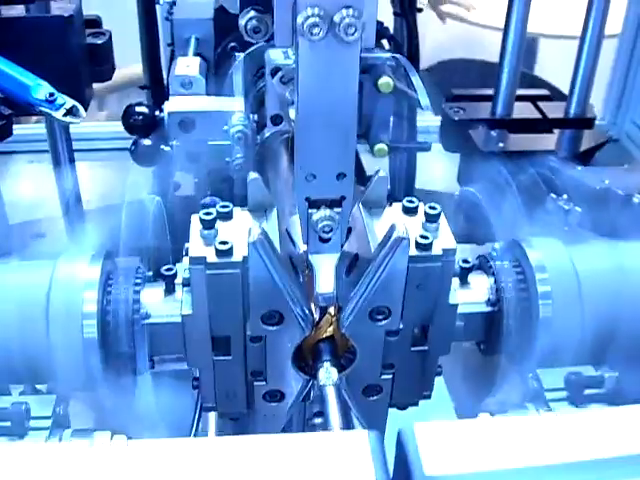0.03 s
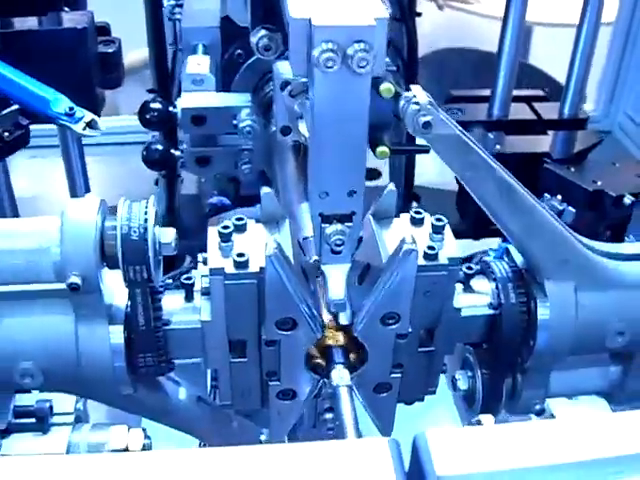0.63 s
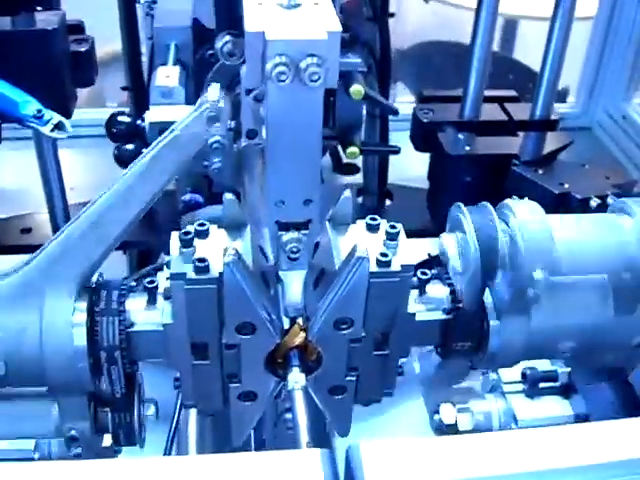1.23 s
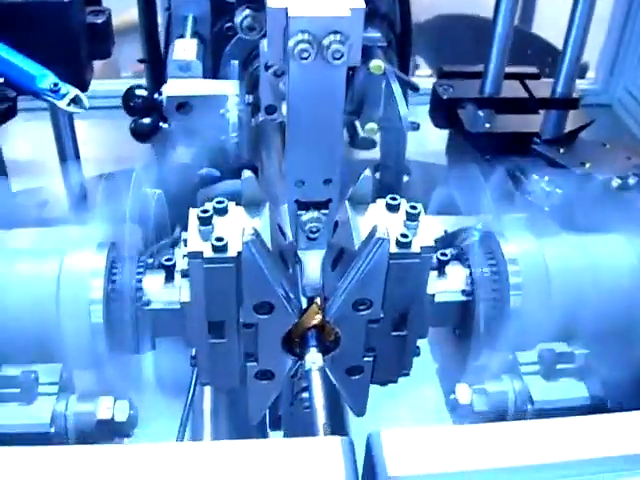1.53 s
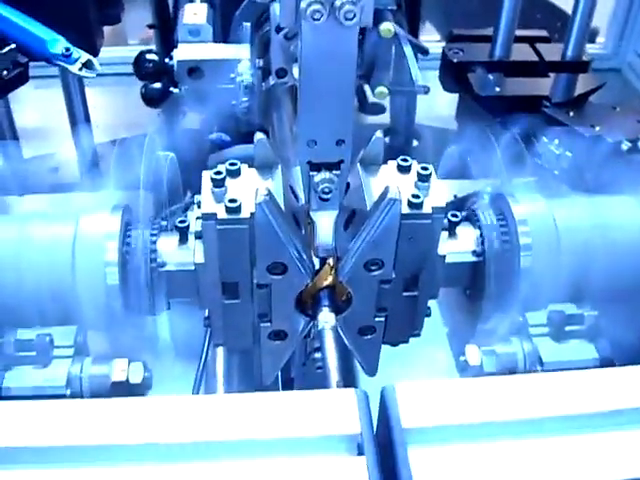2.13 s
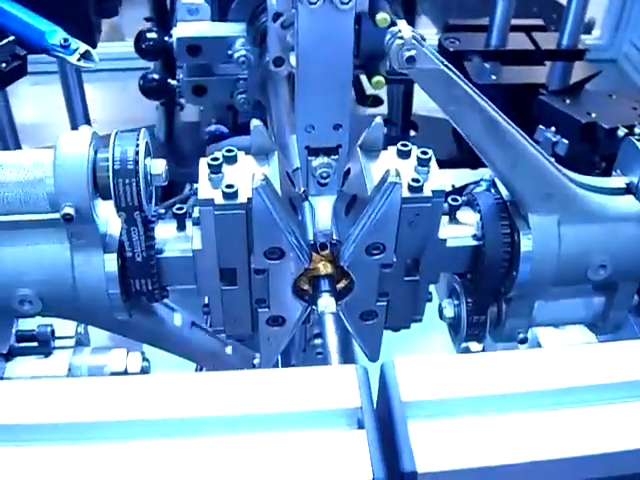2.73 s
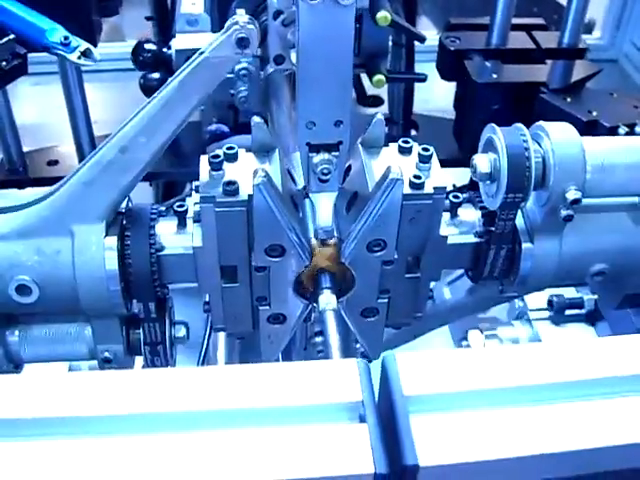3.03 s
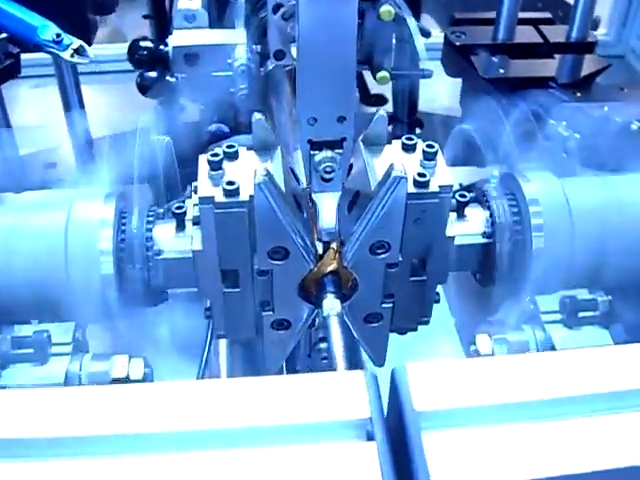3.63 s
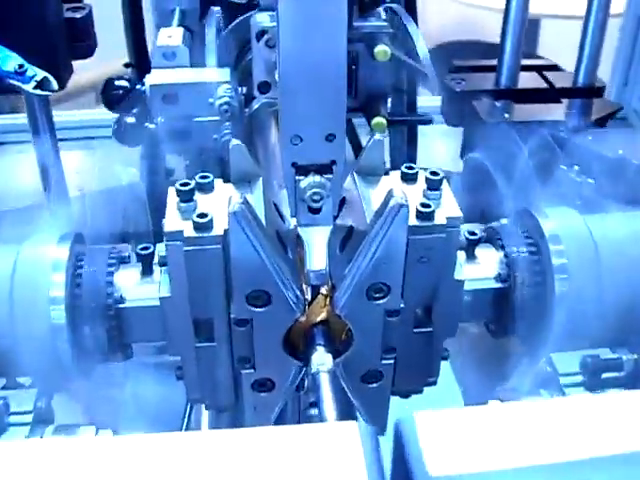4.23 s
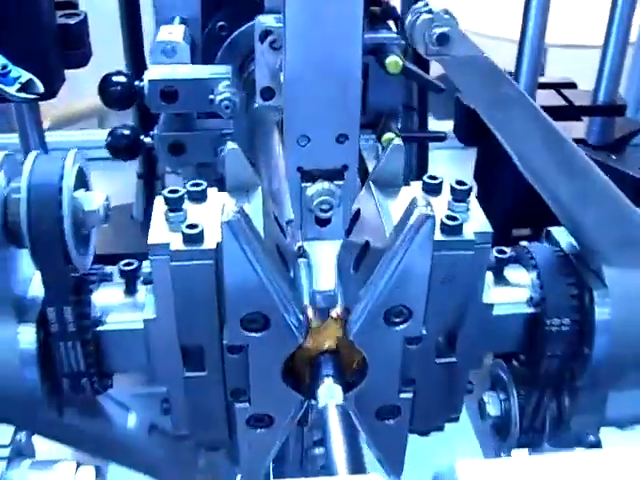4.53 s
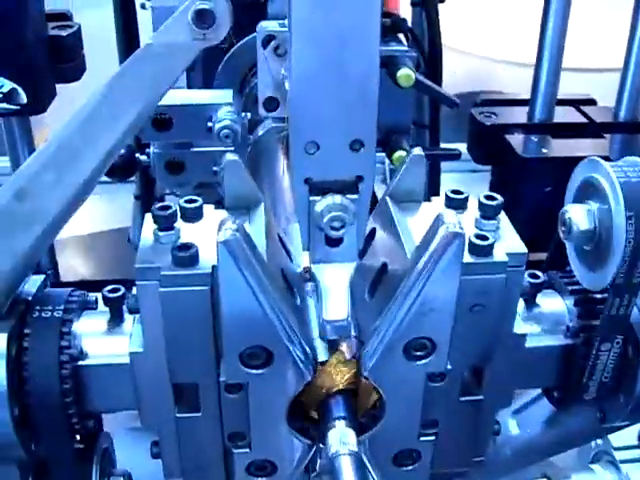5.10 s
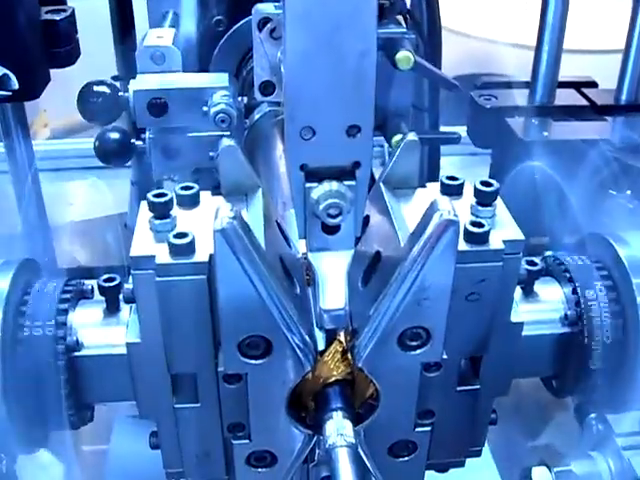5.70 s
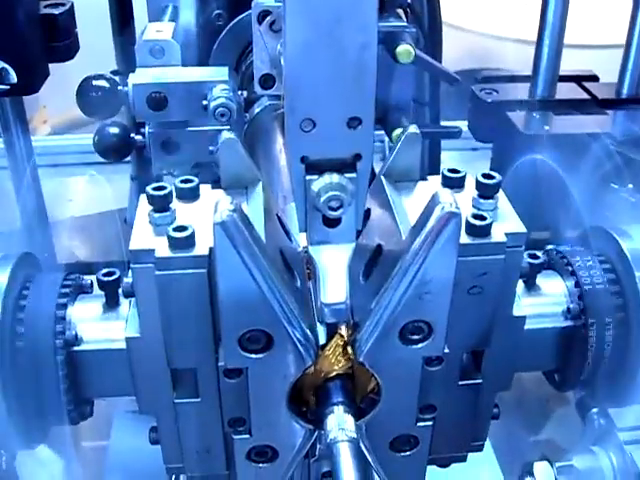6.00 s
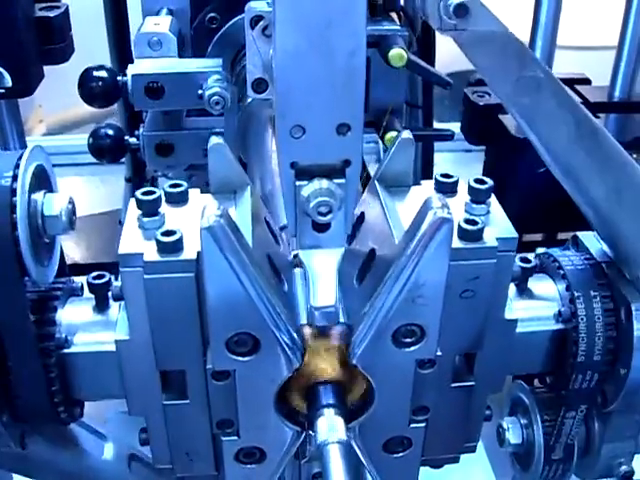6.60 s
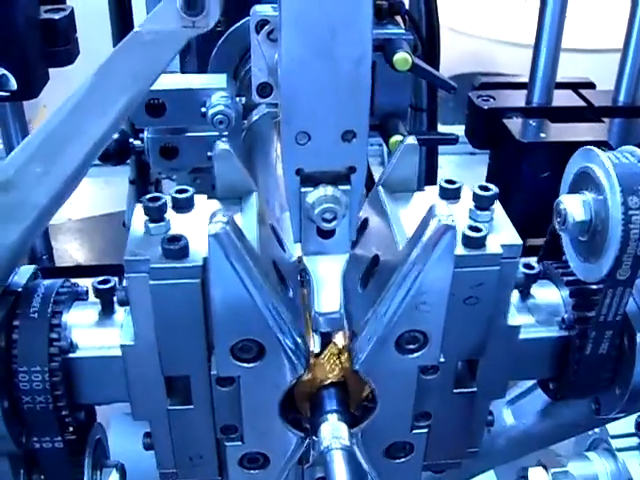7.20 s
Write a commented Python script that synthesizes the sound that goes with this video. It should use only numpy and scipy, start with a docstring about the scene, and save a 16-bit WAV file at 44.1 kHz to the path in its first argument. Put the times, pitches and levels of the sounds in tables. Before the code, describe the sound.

A coil winding machine is already whirring, very close, with a steady whine and the hiss of wire running through guides. It brakes at about 0.2 seconds. A sharp, slightly squealing air blast follows at 0.35, then two loud, briefly ringing steel clacks at 0.7 and 0.9, each led by a cylinder's hiss, and another air blast at 1.1. The machine spins up again with a short belt growl and whirs from 1.3 to 2.3, from 3.3 to 4.3 and from 5.3 to 6.3 seconds. After each spin the same air blasts and clacks return, with the paired clacks near 2.7 and 2.9, 4.75 and 4.95, and 6.8 and 7.0. The last spin carries more low hum and rumble, with three dull microphone bumps just before 6 seconds. A final air blast comes at 7.2. Faint, steady workshop noise lies underneath, and the clacks have a little short reverberation.

```python
"""Armature winding machine

Every two seconds two belt-driven flyers spin up, lay a coil and brake. They whine at harmonics of
the shaft rate while friction makes the wire hiss in its guides. Between coils, valves blow off in
turbulent jets and air cylinders slam the indexing gear against its stops, ringing the casting.
The microphone is very close; its right port is shaded from the treble and the loudest blows clip."""
import sys
import numpy as np
from scipy import signal
from scipy.fft import rfft, irfft, next_fast_len
from scipy.io import wavfile
from scipy.ndimage import map_coordinates

SR = 44100
rng = np.random.default_rng(int(sys.argv[2]) if len(sys.argv) > 2 else 0)


def unload_wav(signal):
    """Save mono or channel-first audio to the path in sys.argv[1] as 16-bit WAV at rate SR, clipped to [-1, 1]."""
    wavfile.write(
        sys.argv[1],
        SR,
        np.round(np.clip(np.atleast_2d(signal).T, -1, 1) * 32767).astype(np.int16),
    )


N = 324135
TIME = np.arange(N) / SR
TURN_HZ = 30.03  # shaft rate at full speed

# one row per coil: spin-up t/s, braking t/s, whine level/dB, hiss level/dB,
# closeness level/dB (low hum and rumble grow as the microphone moves closer)
COILS = [(-.7, .235, 0, 0, 0), (1.285, 2.265, 1.2, .7, -1), (3.305, 4.29, .6, 0, 1),
         (5.345, 6.328, .5, .5, 9)]
# acoustic shadow at the right port: f/Hz, left minus right level/dB
SHADE = [(100, .5), (700, .5), (1280, 5), (2370, 6.5), (4360, 17), (6000, 18.5), (8050, 23), (14800, 32)]


def amp(db):
    """Amplitude ratio of a level in decibels."""
    return np.exp(np.asarray(db) * (np.log(10) / 20))


def unit(x):
    """Normalisation to rms 1."""
    return x / np.sqrt(np.mean(x ** 2) + 1e-20)


def along(points, hz):
    """Interpolation of (f/Hz, value) points on a logarithmic frequency axis."""
    f, v = np.transpose(points)
    return np.interp(np.log(hz + 1), np.log(f + 1), v)


def wobble(rate):
    """Smooth random modulation with `rate` knots a second."""
    knots = rng.standard_normal(int(N * rate / SR) + 4)
    steps = np.arange(4 * len(knots)) / 4
    return np.interp(TIME * rate, steps, map_coordinates(knots, [steps]))


def filtered(x, response):
    """Linear filtering: the spectrum times a frequency response."""
    size = next_fast_len(N + 8192, real=True)
    hz = np.fft.rfftfreq(size, 1 / SR)
    return irfft(rfft(x.astype(np.float32), size) * response(hz), size)[..., :N]


def shaded(x):
    """Acoustic shadowing: a mono sound reaches the right port with less treble."""
    return np.array([x, filtered(x, lambda hz: amp(-along(SHADE, hz)))])


def ports(pair, colour):
    """Sum and difference of two noises give partly coherent stereo of a dB colour, its mean at rms 1."""
    coherence = [(25, .75), (60, .85), (130, .92), (290, .95), (640, .78), (1400, .55), (3080, .25),
                 (6760, .05)]  # likeness of the ports: f/Hz, coherence
    size = next_fast_len(N + 8192, real=True)
    hz = np.fft.rfftfreq(size, 1 / SR)
    grid = np.linspace(0, SR / 2, 4097)
    alike, shade = np.clip(along(coherence, grid), 0, 1), amp(-along(SHADE, grid))
    gain = amp(colour(grid)) / np.sqrt(1 + shade ** 2 + 2 * alike * shade)
    mid, side = rfft(pair.astype(np.float32), size)
    mid = mid * np.interp(hz, grid, gain * np.sqrt(1 + alike))
    side = side * np.interp(hz, grid, gain * np.sqrt(1 - alike))
    left, right = mid + side, (mid - side) * np.interp(hz, grid, shade)
    out = irfft(np.array([left, right], np.complex64), size)[:, :N]
    return out / np.std(out.mean(0))


def resonant(spectrum, peaks):
    """A dB colour: a (f/Hz, level/dB) spectrum plus resonances (f/Hz, width/Hz, level/dB)."""
    return lambda hz: along(spectrum, hz) + sum(
        db / (1 + (2 * (hz - centre) / width) ** 2) for centre, width, db in peaks)


def rush(spectrum, peaks=()):
    """Stereo Gaussian noise shaped by a spectrum and any resonances."""
    return ports(rng.standard_normal((2, N)), resonant(spectrum, peaks))


def add(track, s, sound):
    """Superposition of a sound on a track from time s."""
    part = track[..., round(s * SR):][..., :sound.shape[-1]]
    part += sound[..., :part.shape[-1]]


def puffs(rows, t60):
    """Envelope of bursts (t/s, level/dB, rise/s, hold/s from onset) that decay and add in power."""
    power, t = np.zeros(N), np.arange(SR // 2) / SR
    for s, db, rise, hold in rows:
        burst = np.clip(t / rise, 0, 1) * amp(db - 60 * np.maximum(t - hold, 0) / t60)
        add(power, s, burst ** 2)
    return np.sqrt(power)


def every_cycle(rows):
    """Repetition of rows (move, delay/s, ...) in each indexing cycle, as rows (t/s, ...)."""
    moves = ("unlock", "index", "return", "lock")  # names of the gear's moves: unlock, index, return, lock
    cycles = [(.349, .696, .877, 1.108), (2.381, 2.724, 2.906, 3.129), (4.402, 4.751, 4.939, 5.17),
              (6.441, 6.784, 6.968, 7.19)]  # after each coil: unlock t/s, index stop t/s, return stop t/s, lock t/s
    return [(cycle[moves.index(move)] + delay, *rest) for cycle in cycles for move, delay, *rest in rows]


def spins(run_up_s=.06, run_down_s=.16):
    """Uniform acceleration and braking: flyer speed for each coil, from 0 at rest to 1."""
    return [np.clip((TIME - on) / run_up_s, 0, 1) * np.clip(1 - (TIME - off) / run_down_s, 0, 1)
            for on, off, *_ in COILS]


def flyer_whine(turns, trim_db=-.3, waver_db=1.1, coil_spread_db=1.2):
    """Forced vibration: shaft harmonics ring the frame with an amplitude that goes as speed squared."""
    harmonics = [(2, -49, .6), (3, -46, .8), (4, -50, 1.4), (5, -43.5, 0), (7, -48, .6), (18, -43, .3),
                 (19, -44, .5), (20, -34.5, .15), (21, -37, 1.15), (22, -33.5, .1), (25, -38, -.8),
                 (26, -41, -.1), (31, -35, 0), (32, -39, 0), (33, -39, -.1), (42, -39, -.2),
                 (62, -37.5, -.1), (64, -39.5, -.3), (65, -41, -.3), (107, -45, -.3), (126, -43, -.2),
                 (149, -43.5, -.3)]  # shaft order, level/dB, share of the closeness level
    orders, levels, shares = np.transpose(harmonics)
    whine = np.zeros(N)
    for (on, off, coil_db, _, close_db), ramp in zip(COILS, spins()):
        live = ramp > 0
        t, angle, tones = TIME[live], 2 * np.pi * turns[live], 0
        order_db = levels + shares * close_db + coil_spread_db * rng.standard_normal(len(orders))
        for order, db in zip(np.round(orders), order_db):
            level = np.interp(t, np.linspace(on, off, 10), amp(db + waver_db * rng.standard_normal(10)))
            tones += level * np.sin(order * angle + 2 * np.pi * rng.random())
        whine[live] += np.sqrt(2) * amp(coil_db + trim_db) * ramp[live] ** 2 * tones
    return shaded(whine)


def wire_hiss(turns, hiss_db=-19.2, speed_power=3.1):
    """Friction noise grows steeply with speed; part of the roughness comes round with every turn."""
    spectrum = [(100, -13), (250, -4), (380, -10), (530, -5), (700, -.5), (820, -2), (960, -.7), (1130, -5),
                (1500, -6.3), (3000, -6.3), (3450, -12), (4100, -10), (6000, -6.3), (8300, -9.7),
                (14000, -10)]  # running flyers: f/Hz, level/dB
    guides = [(1270, 45, 6), (1910, 130, 7.8), (2540, 45, 4), (3850, 170, 7.8), (4470, 90, 8.2),
              (5720, 110, 4), (6360, 40, 5), (7130, 65, 6)]  # resonances of arms and wire guides: f/Hz, width/Hz, level/dB
    periodic = [(200, .15), (700, .25), (1500, .25), (4000, .28), (6500, .13), (10000, .03)]  # f/Hz, share of the power that repeats each turn
    size = round(SR / TURN_HZ)
    one_turn = unit(irfft(np.exp(2j * np.pi * rng.random((2, size // 2 + 1))), size))
    roughness = one_turn[:, (turns % 1 * size).astype(int) % size]
    rub = filtered(roughness, lambda hz: np.sqrt(along(periodic, hz)))
    rub += filtered(rng.standard_normal((2, N)), lambda hz: np.sqrt(1 - along(periodic, hz)))
    envelope = sum(amp(hiss_db + db) * ramp ** speed_power for (*_, db, _), ramp in zip(COILS, spins()))
    flutter = amp(.4 * np.sin(4 * np.pi * turns) + .7 * wobble(250) + .3 * wobble(8))
    return envelope * flutter * ports(rub, resonant(spectrum, guides))


def workshop(shop_db=-36.2, idle_db=-43.5, running_db=-49, close_share=1.05):
    """Steady background noise and structure-borne rumble, which grows as the microphone moves closer."""
    shop = [(60, -22), (120, -8), (230, 1.5), (330, -4), (540, .5), (700, -2), (950, -9), (1500, -14),
            (2400, -18), (3200, -23), (6000, -25), (9000, -31), (14000, -33)]  # background: f/Hz, level/dB
    rumble = [(20, -7), (42, -12), (61, 1), (85, -3), (115, -1), (160, -9), (260, -25), (500, -60)]  # bench: f/Hz, level/dB
    running = sum(ramp * amp(running_db + close_share * db) for (*_, db), ramp in zip(COILS, spins()))
    shake = np.hypot(amp(idle_db), running) * amp(1.5 * wobble(12))
    return amp(shop_db) * rush(shop) + shake * rush(rumble)


def belts(speed, turns, strain_db=-14.5, brake_db=-18.5, teeth_db=-4.5):
    """Torque at start and stop makes the belts growl and sing at their gliding tooth-mesh frequencies."""
    driven = [(250, -32), (480, -14), (740, 1), (1050, 1), (1400, -8), (3000, -14), (4300, -9), (5700, -5),
              (7300, -7), (9000, -16), (14000, -19)]  # belts under driving torque: f/Hz, level/dB
    braked = [(250, -25), (380, -10), (560, -1), (780, 2), (1050, -6), (1400, -8), (3000, -14), (4300, -9),
              (5700, -4), (7300, -6), (9000, -15), (14000, -19)]  # belts under braking: f/Hz, level/dB
    casting_ring = [(450, 50, 10)]  # casting rung by the slowing belts: f/Hz, width/Hz, level/dB
    tooth_counts = (24, 34)  # teeth meshing per turn
    strain, braking = np.zeros((2, N))
    for on, off, *_ in COILS:
        strain += amp(strain_db) * np.exp(-np.abs((TIME - on - .054) / .033) ** 1.7)
        braking += amp(brake_db) * np.exp(-np.abs((TIME - off - .018) / .041) ** 1.6)
    mesh = sum(np.sin(2 * np.pi * teeth * turns) for teeth in tooth_counts)
    load = strain + braking * speed ** 2
    singing = amp(teeth_db + 2.5 * wobble(120)) * load * speed * mesh
    return shaded(singing) + strain * rush(driven) + braking * rush(braked, casting_ring)


def jolts():
    """Reaction force: each moving cylinder sways the bench for a few low cycles."""
    kicks = [("unlock", -.02, -33.5, 57, .06), ("unlock", .075, -34, 110, .09),
             ("unlock", .09, -41, 62, .2), ("index", -.075, -35, 59, .07), ("return", -.075, -38, 60, .08),
             ("return", .03, -37, 105, .08)]  # move, delay/s, level/dB, f/Hz, length/s
    sway = np.zeros(N)
    for s, db, hz, length in every_cycle(kicks):
        t = np.arange(round(length * SR)) / SR
        envelope = np.sqrt(2) * amp(db) * np.sin(np.pi * t / length) ** 2
        add(sway, s, envelope * np.sin(2 * np.pi * (hz * t + rng.random())))
    return sway


def valves(blow_db=-2.5, squeal_db=-2.5, sag_db=-7.5, spit_db=-8.5):
    """Jet noise: each valve spits and squeals open, then dumps its air through a hollow muffler."""
    blow_offs = [("unlock", 0, -13.3, .018, .026), ("lock", 0, -11.2, .011, .022)]  # move, delay/s, level/dB, rise/s, hold/s
    muffler = [(250, -35), (600, -18), (1400, -18), (2400, -12), (3200, -13), (4500, -6), (5300, -4.5),
               (6400, -3.5), (7200, -17), (9500, -17), (11000, -15), (12700, -12), (14000, -19)]  # muffled exhaust: f/Hz, level/dB
    squeal = [(4800, -40), (5600, -6), (6100, 0), (6500, -2), (7000, -40)]  # valve seat cracking open: f/Hz, level/dB
    sag = [(3300, -30), (4200, -2), (5200, 0), (5800, -8), (6600, -30)]  # lower squeal as the pressure falls: f/Hz, level/dB
    spit = [(3000, -25), (7000, -8), (10500, -2), (12700, 0), (14000, -6)]  # first air through the valve: f/Hz, level/dB
    openings = every_cycle(blow_offs)
    exhaust = amp(blow_db) * puffs(openings, t60=.16)
    squeals = amp(squeal_db) * puffs([(s, db, .7 * rise, .016) for s, db, rise, _ in openings], t60=.1)
    sags = amp(sag_db) * puffs([(s + .01, db, rise, .018) for s, db, rise, _ in openings], t60=.11)
    spits = amp(spit_db) * puffs([(s, db, .6 * rise, .014) for s, db, rise, _ in openings], t60=.08)
    return exhaust * rush(muffler) + squeals * rush(squeal) + sags * rush(sag) + spits * rush(spit)


def ringing(modes, attack_s, spread_rad):
    """Free decay of struck modes, each with a random strength, detuning and phase at either port."""
    t = np.arange(SR // 4) / SR
    hz, db, t60 = np.transpose(modes)
    strength, detuning, start, skew = rng.standard_normal((4, len(hz)))
    gain = unit(amp(db + 2.5 * strength)) * np.sqrt(2 / len(hz))
    decay = gain[:, None] * amp(-60 * t / t60[:, None])
    phase = 2 * np.pi * (np.outer(hz * (1 + .02 * detuning), t) + start[:, None])
    left = (decay * np.sin(phase)).sum(0)
    right = amp(-along(SHADE, hz)) @ (decay * np.sin(phase + spread_rad * skew[:, None]))
    return np.array([left, right]) * (1 - np.exp(-t / attack_s))


def stops(clatter_db=-4.5, casting_db=-3.5, bed_db=.5, bend_hz=680, bend_share=.7):
    """Impact excitation: each blow cracks the steel, rattles links, rings the casting, thumps the bed."""
    # blows and rebounds: move, delay/s, crack level/dB, casting level/dB, bed level/dB
    impacts = [("unlock", .021, -21, -14.5, -40), ("unlock", .043, -24, -20, -40),
               ("unlock", .086, -22, -26, -40), ("index", 0, -7.5, -17, -35),
               ("index", .013, -13, -11, -15), ("index", .089, -29, -28, -30), ("return", 0, -14, -13, -19),
               ("return", .0145, -14.5, -12, -21), ("return", .036, -17, -22, -16),
               ("lock", .042, -25, -36, -45)]
    casting = [(455, -2, .16), (527, 1, .28), (585, -7, .36), (655, -4, .26), (700, 1, .19), (824, -2, .15),
               (905, -7, .12), (1034, -9, .15), (1340, -9, .1), (1577, -10, .12), (1776, -8, .14),
               (1933, -6, .1), (2207, -8, .07), (2347, -7, .08)]  # casting modes: f/Hz, level/dB, t60/s
    bed = [(205, -3, .12), (256, 0, .18), (286, -3, .13), (340, -6, .12)]  # machine bed modes: f/Hz, level/dB, t60/s
    steel = [(500, -20), (1000, -4), (1800, 2), (3000, 0), (6000, 0), (9000, -1), (14000, -2)]  # dense steel modes: f/Hz, level/dB
    links = [(150, -28), (450, -10), (800, 1), (1150, -6), (1800, -2), (2600, -4), (4000, -10), (9000, -28)]  # loose links: f/Hz, level/dB
    body, blows = np.zeros((2, N)), every_cycle(impacts)
    for s, _, ring_db, thump_db in blows:
        # only blows heavy enough to thump the bed fully excite the casting's lowest bending modes
        light_db = bend_share * min(0, thump_db - ring_db + 10)
        modes = [(hz, db + light_db * (hz < bend_hz), t60) for hz, db, t60 in casting]
        add(body, s, amp(ring_db + casting_db) * ringing(modes, attack_s=.002, spread_rad=.5))
        add(body, s, amp(thump_db + bed_db) * ringing(bed, attack_s=.005, spread_rad=.2))
    crack = puffs([(s, db, .0005, .002) for s, db, _, _ in blows], t60=.105)
    clatter = puffs([(s, db + clatter_db, .002, .003) for s, _, db, _ in blows], t60=.13)
    return body + amp(1.2 * wobble(500)) * (crack * rush(steel) + clatter * rush(links))


def slide():
    """Sliding friction: the slide coasts on after the flyers stop, and its noise dies away."""
    glides = [("unlock", .108, -29.5, .015, .03)]  # move, delay/s, level/dB, rise/s, hold/s
    spectrum = [(100, -20), (300, -7), (700, 0), (1200, -4), (2200, -4.5), (3000, -10), (6000, -13),
                (8500, -11.5), (11000, -17), (14000, -19)]  # coasting slide: f/Hz, level/dB
    return puffs(every_cycle(glides), t60=.58) * amp(1.2 * wobble(80)) * rush(spectrum)


def leaks(leak_hz=12100, width_hz=190):
    """Narrow-band flow noise: the last air leaves a cylinder with a thin whistle."""
    escapes = [("unlock", .2, -53, .03, .07), ("return", .082, -51, .03, .07)]  # move, delay/s, level/dB, rise/s, hold/s
    noise = rng.standard_normal((2, N))
    whistle = ports(noise, lambda hz: -20 * np.log10(1 + ((hz - leak_hz) / width_hz) ** 2))
    return puffs(every_cycle(escapes), t60=.2) * whistle


def cylinders():
    """Turbulent flow hisses, and the air ports whistle, as each cylinder travels."""
    strokes = [("index", -.053, -15.7, .016, .034), ("return", -.055, -14.3, .026, .056),
               ("lock", .122, -21.5, .011, .04)]  # move, delay/s, level/dB, rise/s, hold/s
    air = [(250, -22), (500, -10), (800, -8), (1300, -8), (1750, -2.5), (2100, -7), (2600, -3),
           (3600, -1.5), (4300, -4), (5100, -2.5), (7500, -4.5), (9100, -3.5), (10000, -4), (14000, -3.5)]  # hiss: f/Hz, level/dB
    port_tones = [(4500, 200, 5), (9150, 500, 5), (10800, 400, 3)]  # air port resonances: f/Hz, width/Hz, level/dB
    return puffs(every_cycle(strokes), t60=.13) * amp(1.1 * wobble(110)) * rush(air, port_tones)


def wire_snatch(level_db=-22):
    """A tension transient: the wire is pulled taut at spin-up with a bright burst of noise."""
    spectrum = [(900, -20), (1800, 0), (3500, -3), (5500, 0), (7500, -2), (10000, -4), (14000, -4)]  # tautening wire: f/Hz, level/dB
    pulls = [(on + .004, level_db, .015, .06) for on, *_ in COILS if on > 0]
    return puffs(pulls, t60=.12) * rush(spectrum)


def handling_thuds():
    """Structure-borne sound: a few dull, low thuds as the microphone is handled."""
    thuds = [(5.805, -24), (5.9, -26), (5.98, -28)]  # t/s, level/dB
    spectrum = [(60, -15), (125, 0), (220, -5), (450, -16), (900, -40)]  # handling noise: f/Hz, level/dB
    return puffs([(s, db, .008, .02) for s, db in thuds], t60=.12) * rush(spectrum)


def plates(x, echo_db=-20, longest_s=.012, count=7):
    """Comb filtering: early treble reflections from nearby steel plates add a metallic colour."""
    bright, out = filtered(x, lambda hz: np.clip(hz / 2500 - .3, 0, 1)), x.copy()
    for delay in rng.uniform(.001, longest_s, count):
        add(out, delay, amp(echo_db) * bright)
    return out


def room(x):
    """Diffuse reverberation of the workshop, the treble dying first."""
    decay_times = [(200, .45), (1500, .38), (4000, .32), (7000, .26), (14000, .14)]  # reverberation time: f/Hz, t60/s
    hz, t, noise = signal.stft(rng.standard_normal((2, SR // 2)), SR, nperseg=256)
    decay = amp(-60 * t / along(decay_times, hz)[:, None])
    tail = signal.istft(noise * decay, SR, nperseg=256)[1]
    return signal.fftconvolve(x, tail / np.linalg.norm(tail[0]), axes=1)[:, :N]


def scene(wet_db=-16):
    """Superposition of winding, indexing and workshop; only the indexing reverberates."""
    speed = sum(spins())
    turns = np.cumsum(speed) * TURN_HZ / SR
    winding = flyer_whine(turns) + wire_hiss(turns) + belts(speed, turns) + wire_snatch()
    indexing = valves() + stops() + slide() + leaks() + cylinders()
    surroundings = workshop() + jolts() + handling_thuds()
    return plates(winding + indexing) + amp(wet_db) * room(indexing) + surroundings


def record(dry, ceiling=.95, lag_s=.00009, top_hz=14300):
    """Path difference delays the right port; saturation rounds the peaks, then the band is limited."""
    heard = filtered(dry, lambda hz: np.exp(1j * np.pi * lag_s * np.outer([1, -1], hz)))
    clipped = heard / (1 + (heard / ceiling) ** 6) ** (1 / 6)
    return filtered(clipped, lambda hz: hz < top_hz)


dry = scene()
out = record(dry)
unload_wav(out)
```